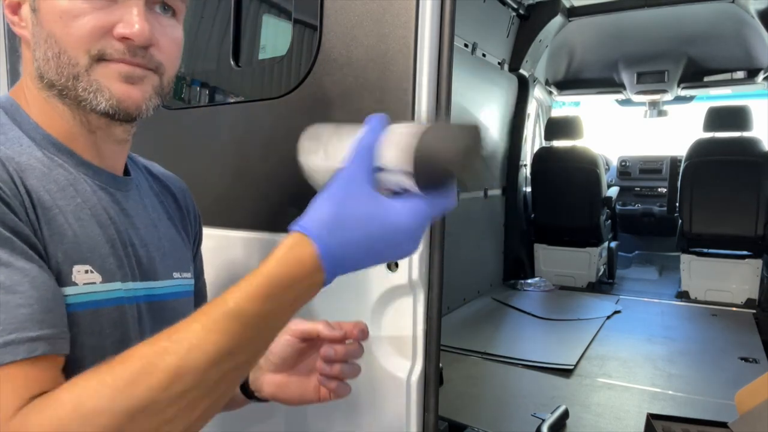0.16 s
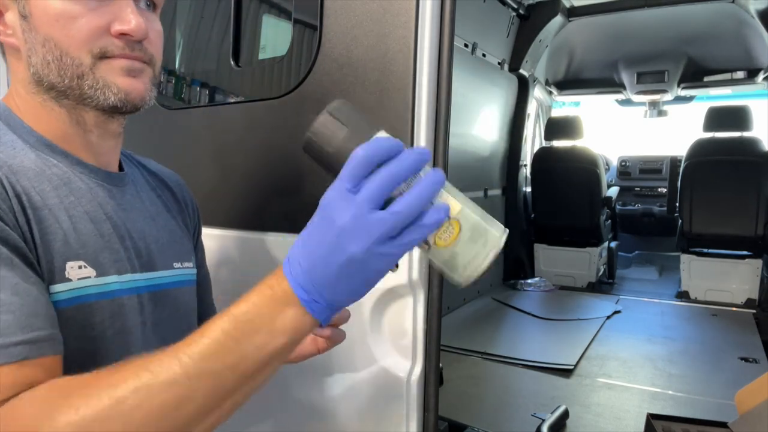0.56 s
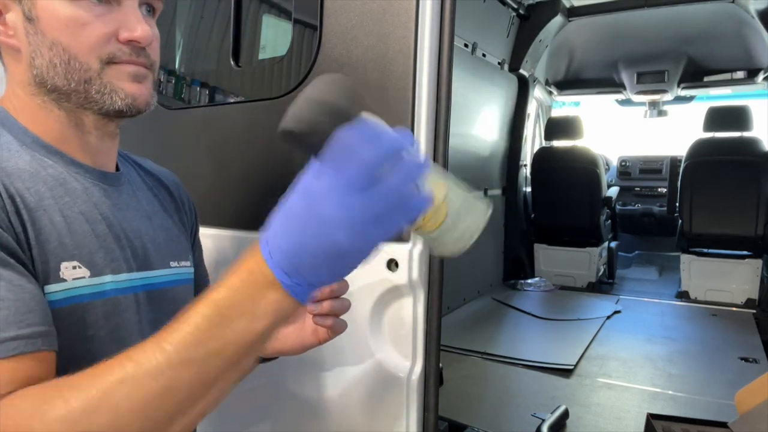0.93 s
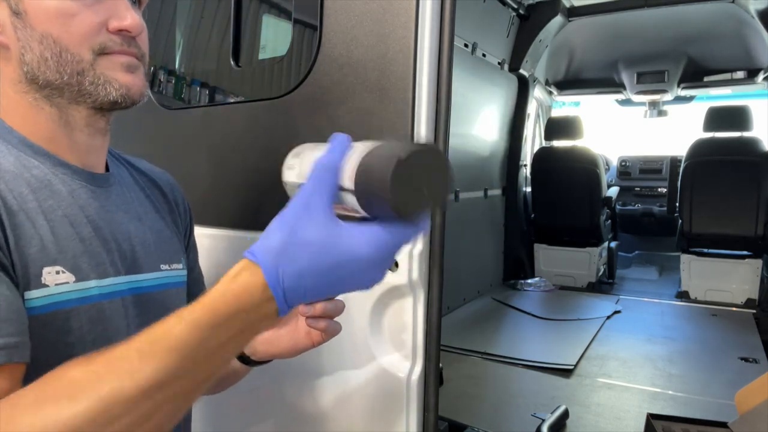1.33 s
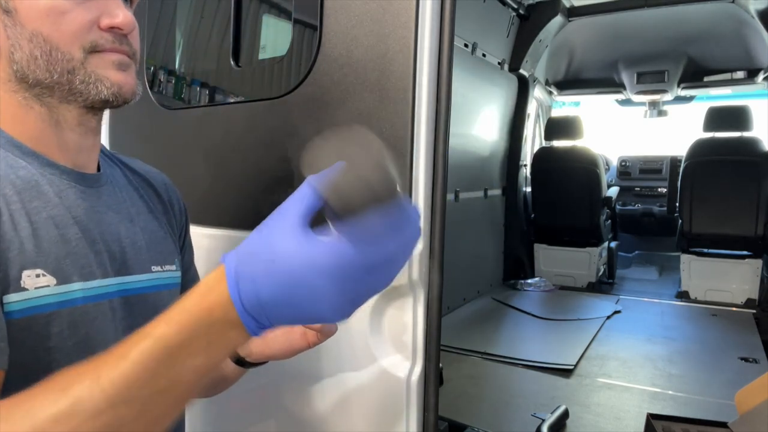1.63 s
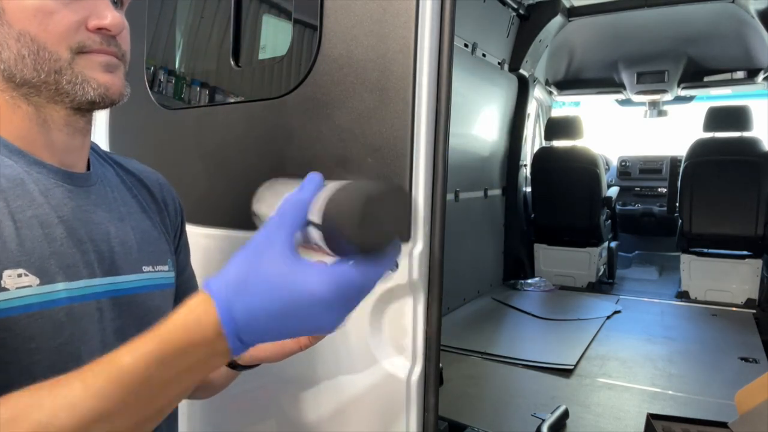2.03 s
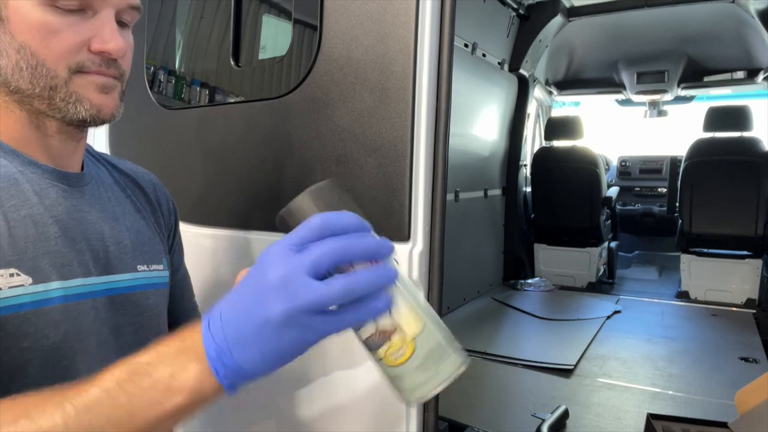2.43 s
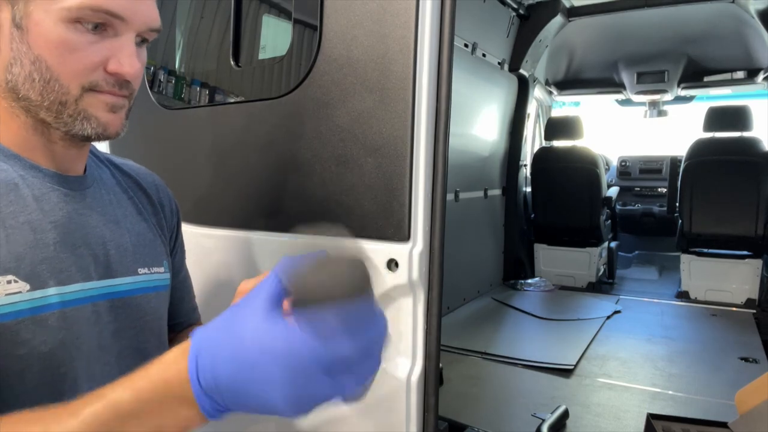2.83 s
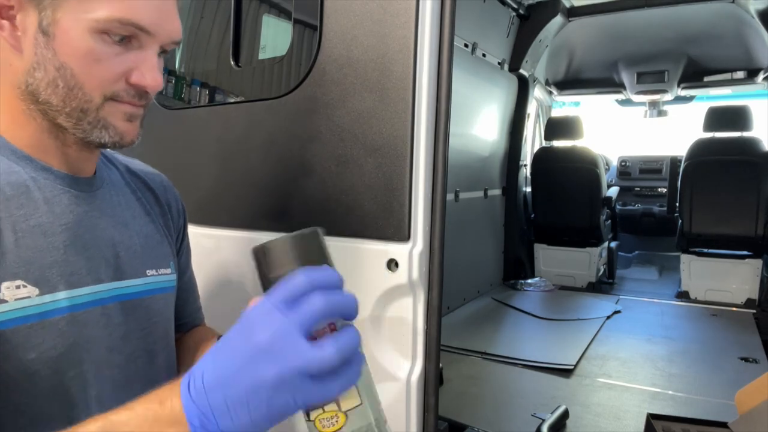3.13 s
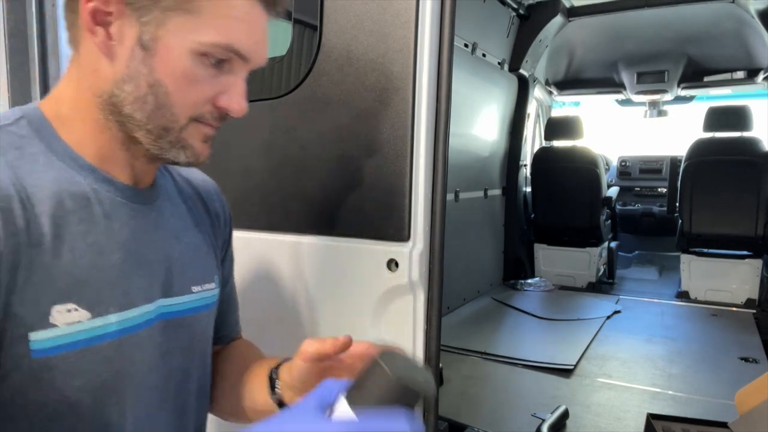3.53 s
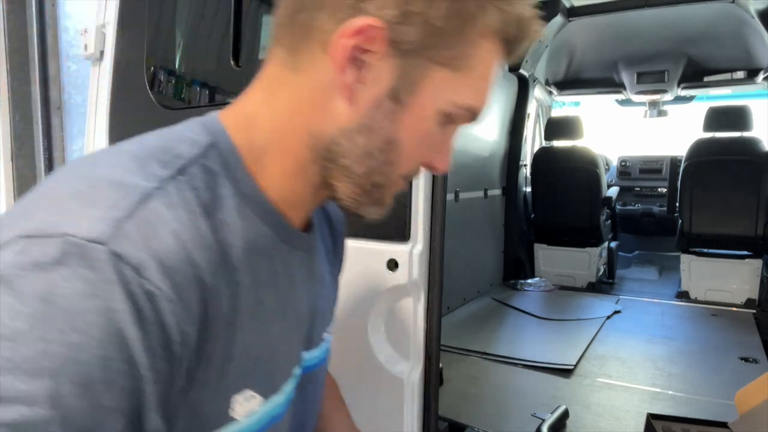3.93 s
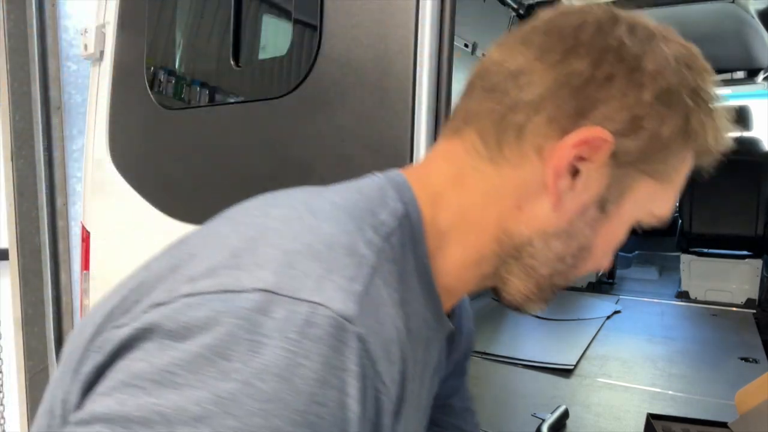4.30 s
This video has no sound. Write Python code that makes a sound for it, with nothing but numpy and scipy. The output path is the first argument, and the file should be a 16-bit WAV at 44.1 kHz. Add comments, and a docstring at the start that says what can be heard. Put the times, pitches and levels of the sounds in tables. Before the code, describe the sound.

Rapid metallic rattling of a ball inside an aerosol can, echoing in an empty van, stops and gives way to small put-down knocks.

```python
"""Hard, bright clacks come first: a paint can is shaken at the open back of a van, over an echo already ringing.
Each clack is a short push of the ball, with a crack and shiver, heard through the modes of the can.
Turned in the hand, the can knocks duller; then small taps and scrapes set it down. Filtered slaps, splats
and froth make the paint. The can lies a little right of the stereo microphones; noise tails echo as the bare
cargo bay; shaped noise and a sine make the faint outdoor rumble, air and hum."""
import sys
import numpy as np
from scipy import signal
from scipy.fft import rfft, irfft, next_fast_len
from scipy.io import wavfile

SR = 44100
rng = np.random.default_rng(int(sys.argv[2]) if len(sys.argv) > 2 else 0)


def materialize(psi):
    """Save the field psi as 16-bit PCM at rate SR to the path in sys.argv[1].

    A 1-D psi becomes a single channel; in a 2-D psi each row is a channel.
    """
    bounded = np.clip(np.atleast_2d(psi).T, -1, 1)
    quanta = np.round(bounded * 32767).astype(np.int16)
    wavfile.write(sys.argv[1], SR, quanta)


N = 196641

SIZE = 4096  # samples in one contact
HZ = np.fft.rfftfreq(SIZE, 1 / SR)
LEAD_S = 0.001835  # a short swell of noise before each hit
TURN_S = 1.58  # the hand turns the can
TYPICAL_DB = -10.5  # strength of a typical blow

# the ball hits the can: (start time [s], strength [dB], dome ring [dB], nominal dome pitch [Hz],
# dullness [dB], nominal shell pitch [Hz], nominal wall pitch [Hz], extra crack [dB])
BLOWS = [(0.009, -5.5, -25.5, 1830, -0.5, 3600, 1110, 2), (0.058, -11, -24.5, 1860, -4, 3840, 1090, 5.5),
         (0.086, -4, -19.5, 1804, 5, 3750, 990, 1.5), (0.142, -5.5, -49, 1750.0, 3, 3770, 700, 8),
         (0.165, -8, -26.5, 1800, -1.5, 3920, 1070.0, -5), (0.219, -8, -30, 1800, -2.5, 4470, 1050.0, 4.5),
         (0.25, -6, -21.5, 1760, 3, 3080, 1100, 2), (0.31, -6, -35, 1950, 3, 3880, 764, 3.5),
         (0.339, -8, -23.5, 1860, 0.5, 3440, 980.0, 3.5), (0.365, -10, -40, 1970, 1.5, 4470, 730, 2),
         (0.415, -14.5, -30, 1830, -3, 3740, 1050.0, 3), (0.477, -27.5, -31, 1740, -4, 4230, 1090.0, 25),
         (0.501, -8, -27.5, 1830, -4.0, 3600, 930, 2), (0.551, -13.5, -33, 1940, -6, 4670, 880.0, 3),
         (0.584, -12, -33, 2180, 5.0, 3480, 870, 3), (0.591, -14.5, -29, 1800, -3.5, 2940, 770.0, 9.5),
         (0.645, -18, -25.5, 1794, 5.5, 3750, 1010.0, 16), (0.694, -19, -38.5, 1850, 4, 4930, 890, 17),
         (0.719, -6, -28, 1910, 0.5, 4200, 826, -1.5), (0.736, -19, -30.5, 1850, -6, 3150, 1000.0, -4),
         (0.747, -11.5, -29, 2060, -0.5, 3420, 1010, 1), (0.755, -9, -24, 1760, -1, 3500, 1090, 2.5),
         (0.824, -3.5, -22.5, 1836, -1, 3830, 720, -1.5), (0.895, -7, -24.5, 1830, 3, 3400, 840, 4),
         (0.932, -9.5, -28.5, 1860, -6.5, 4340, 1050.0, -7),
         (0.938, -8.5, -34, 1860, -2.5, 3900.0, 1070.0, -3),
         (0.948, -12.5, -29, 1740, -1.5, 3480, 1080.0, 9), (0.976, -10, -35, 1640, 1, 4660, 1070.0, 6),
         (0.992, -4.5, -37, 1820, 1.5, 3630, 790, -7), (1.006, -7, -26, 1730, 4.5, 3570, 910, 4.5),
         (1.066, -11, -29, 1830, -6, 4260, 920.0, 2), (1.093, -4.5, -22.5, 2020, 5.5, 3080, 1070, -2),
         (1.108, -9, -25.5, 1800, -1, 3770, 1110, 3), (1.145, -10.5, -37, 1600, -3.5, 4600, 990, -19),
         (1.16, -5.5, -38, 2030, 4.5, 4050, 870, -13), (1.198, -24.5, -53, 1770, -13.5, 4850, 960.0, -12),
         (1.238, -19.5, -27, 1920, -8.5, 3550, 1110, 13), (1.261, -9.5, -34, 1920, -4.5, 4600, 960, -2),
         (1.283, -42, -29.5, 1870, 16.5, 3680.0, 960, 2), (1.329, -7.5, -33, 1720, 1, 4130, 920, 2.5),
         (1.366, -14, -36, 1800, 3.5, 3360, 795, 4), (1.394, -8.5, -33, 2150, -1, 4150, 855, 2),
         (1.42, -16.5, -33, 1840, -6, 3570, 1010.0, 10), (1.434, -9.5, -29.5, 1760, -3, 3900, 1080, 0),
         (1.448, -7.5, -25, 1906, 1, 3600, 1090, 3.5), (1.495, -2.5, -42, 1510, 1.5, 4480, 730, -29),
         (1.521, -7.5, -27.5, 1740, 0, 4100, 1010, -0.5), (1.63, -8, -24.5, 1415, -2, 3950, 1090, -3),
         (1.642, -20, -33, 1580, -4, 4300, 950, -3), (1.653, -7, -40, 1570, -1.5, 4650, 815, 3),
         (1.684, -12, -31.5, 1700, -3, 4760, 940, 1.5), (1.697, -12.5, -28, 1700, -2.5, 3560, 1030.0, -12),
         (1.749, -9, -28.5, 2000, -1, 3070, 880, 5), (1.776, -10.5, -24, 2260, 4, 3340, 1120, 4),
         (1.795, -24, -37, 2050, 3, 3470.0, 900.0, 4), (1.819, -14, -33, 1490, 1.5, 3860, 830, 9),
         (1.86, -6.5, -26, 1720, -2, 4600, 1050, -8), (1.896, -19.5, -33, 1840, -3, 3344, 760.0, 3),
         (1.911, -26, -36, 1810, 0, 3540, 980, 4), (1.94, -36, -29, 1860, -1, 3730.0, 1010.0, 7),
         (1.988, -10.5, -40, 1490, 2, 4040, 910, 6), (2.035, -5, -25.5, 1640, -3, 4480, 1060, -6.5),
         (2.069, -15.5, -32, 1870, 0, 3720.0, 830, 3.5), (2.093, -20, -40, 1780, -4.5, 3180, 910.0, 2),
         (2.105, -22, -41, 1970, -7, 3500, 960, -8), (2.126, -4, -22, 1800, 2, 4740, 1190, 1),
         (2.141, -11, -48, 1820, -1.5, 3800, 980, 1), (2.16, -13.5, -44.0, 1410.0, 2.5, 3570.0, 804, 4),
         (2.172, -18, -53, 1600.0, -1.5, 3920.0, 740.0, 5),
         (2.206, -4.5, -21.5, 1540, -3, 4300.0, 1100, -10), (2.23, -14.5, -28.5, 1900, -1, 4230, 920, 1),
         (2.299, -6.5, -22.5, 1764, 0.5, 3060, 1000, 0), (2.323, -18.5, -34, 1700, -1.5, 4570, 1080.0, 8),
         (2.336, -11.5, -36, 1480, 0, 3250, 900, -6), (2.379, -20, -45, 1870, -4, 4160, 910, 1),
         (2.424, -9.5, -27.5, 1890, -2.5, 4180, 900, -2), (2.46, -13, -23.5, 1880, 4, 3920, 1100, 7),
         (2.472, -15, -41, 1860, -1, 3940, 880, -2), (2.49, -23, -51, 1660, -6, 3560, 1000.0, 9.5),
         (2.499, -15.5, -29.5, 1470, 1.5, 4160, 990, -9), (2.548, -5, -25.5, 1760, 0, 5140, 960, -4),
         (2.583, -13, -31, 1840, -1, 4240, 800, 0), (2.597, -24, -35, 1850, -4, 4060, 800.0, 1),
         (2.625, -20, -33, 1750, -5.5, 4460, 1040.0, -2), (2.679, -7, -45, 1420, -2.5, 4400, 790, -1),
         (2.712, -4.5, -23, 1520, -1.5, 4000, 1060, -4), (2.751, -16.5, -30, 2320, -2, 4260, 840.0, 1.5),
         (2.778, -22, -46, 1790, -5, 4300, 950, 2), (2.785, -23, -41, 1770, -4.5, 3660.0, 1040.0, -3),
         (2.809, -16.5, -20, 1810, -1.5, 3970, 1060, 1.5), (2.82, -19.5, -43, 1800, 1, 4400, 950, -3.5),
         (2.843, -5.5, -35, 1780, -2.5, 4400, 920, 1), (2.888, -5, -24, 1765, 0, 4700, 1020.0, -0.5),
         (2.936, -15, -30, 1770, -2, 3080, 1000, 6), (2.97, -14.5, -26, 1900, 1.0, 4630, 1100, 2),
         (2.982, -14, -26, 1500, -1.5, 4670, 1030, 2), (3.009, -13, -40, 1630.0, -0.5, 4070, 870, 3.5),
         (3.058, -6.5, -25, 1556, -0.5, 4700, 1040, -4), (3.081, -45, -32.5, 1440, 3, 3700, 1130, -7),
         (3.116, -14, -24.5, 1970, -3.5, 3580, 800, 4.5), (3.144, -6, -19, 1745, -0.5, 2770, 874, 0.5),
         (3.159, -24, -42, 1530, 6, 4170.0, 955, -4), (3.18, -19, -32, 2170, -1.5, 3960, 870.0, 2),
         (3.232, -10.5, -26.5, 1840, -0.5, 3320, 1010, -5),
         (3.256, -37, -31.0, 1740, -7, 3420.0, 1080.0, 2), (3.276, -35, -39, 1710, -2, 3590.0, 1120.0, -5),
         (3.291, -12.5, -30, 1780, -5.5, 3700, 950.0, 0), (3.321, -7, -24, 1620, -1.5, 4630, 1040, -4),
         (3.34, -28, -25.5, 1700, 7, 3870, 1100, 6), (3.357, -11.5, -31, 1550, -1.5, 4440, 850, 2),
         (3.397, -7, -19, 1770, -5.5, 4500, 1100.0, -2.5), (3.41, -24, -28.5, 1540, 9.5, 3780.0, 980, -5),
         (3.447, -13.5, -34, 2020, -3, 4200, 860.0, -1), (3.476, -22.5, -32.5, 1730, -2, 4070, 1060, 0),
         (3.489, -26.5, -34, 1780, 2, 4020.0, 1000, 2), (3.513, -27.5, -37.5, 1690, -5, 3150.0, 950, -3),
         (3.557, -57, -45, 1750, -4, 3550, 1080.0, 1)]
# how strongly the paint churns: (time [s], level [dB])
CHURNING = [(0.0, -46), (0.19, -49), (0.42, -46.5), (0.67, -51), (0.89, -46.5), (1.15, -47.5), (1.48, -58),
            (1.87, -35), (2.13, -40), (2.49, -41.5), (2.67, -38.5), (3.34, -41.5), (3.54, -43),
            (3.63, -54.5), (3.83, -47), (3.91, -57), (4.02, -40), (4.12, -44.5), (4.25, -38.5), (4.37, -60),
            (4.46, -59)]
# the can's wall, strongest mode first: (centre [Hz], nominal width [Hz], relative level [dB])
WALL_MODES = [(1000, 820, -3.5), (434, 393, -5), (1230, 990, -4)]
# the domed base, struck at its centre: (centre [Hz], nominal width [Hz], relative level [dB])
DOME_MODES = [(1825, 106, 4.5), (1473, 102, -6.5), (2320, 234, -6.5)]
# the steel shell, strongest mode first: (centre [Hz], nominal width [Hz], relative level [dB])
SHELL_MODES = [(3900, 1200, 4), (2680, 2000, -9), (4440, 800, -11.5)]
# high modes at the point of contact: (centre [Hz], nominal width [Hz], relative level [dB])
CONTACT_MODES = [(6110, 1650, 4), (6430, 1200, 0.5), (9010, 1220, -3.5), (13400, 460, -20),
                 (15700, 440, -56)]
# the bare snap of ball on steel: (centre [Hz], nominal width [Hz], relative level [dB])
SNAP_MODES = [(5300, 1320, 1), (2940, 1230, -3), (12000, 890, -20)]


def amp(db):
    """Decibels to gain."""
    return 10 ** (np.asarray(db) / 20)


def unit(x):
    """Scale to rms 1."""
    return x / np.sqrt(np.mean(np.abs(x) ** 2) + 1e-20)


def along(points, hz):
    """(Hz, value) points read on a log frequency axis."""
    f, v = np.transpose(points)
    return np.interp(np.log(hz + 1), np.log(f + 1), v)


def filtered(x, response):
    """x times a response of frequency."""
    m = next_fast_len(N + SR // 2)
    spectrum = rfft(x, m) * response(np.fft.rfftfreq(m, 1 / SR))
    return irfft(spectrum, m)[..., :N]


def coloured(x, spectrum):
    """x shaped by (Hz, dB) points, at rms 1."""
    return unit(filtered(x, lambda hz: amp(along(spectrum, hz))))


def noise(side_db):
    """White stereo noise, from mono to fully unrelated sides (0 dB)."""
    mid, side = rng.standard_normal((2, N))
    return mid + amp(min(side_db, 0)) * np.array([side, -side])


def add(out, s, sound):
    """Mix a sound in at a time."""
    room = out[..., max(round(s * SR), 0):][..., :SIZE]
    room += sound[..., :room.shape[-1]]


def causal(gain):
    """The minimum-phase response with this gain: it rings only after the blow."""
    cepstrum = irfft(np.log(np.maximum(gain, 1e-6)))
    cepstrum[1:SIZE // 2] *= 2
    cepstrum[SIZE // 2 + 1:] = 0
    return np.exp(rfft(cepstrum))


def retuned(modes, first_hz, damping=1):
    """Shift a group of modes so that its first lies at a pitch; damping widens them."""
    return [(hz * first_hz / modes[0][0], width * damping, db) for hz, width, db in modes]


def resonances(modes, detune, vary_db):
    """Gain of a group of modes; each point of impact shifts and weights them anew."""
    power = 0
    for hz, width, db in modes:
        centre = hz + detune * min(width, hz / 2) * rng.uniform(-1.33, 1)
        off = (HZ ** 2 - centre ** 2) / (width * (HZ + 1))
        mode_power = amp(db + vary_db * rng.normal()) ** 2
        power = power + mode_power / (1 + off ** 2) / (1 + (off / 1.13) ** 2)
    return np.sqrt(power)


def bending(delay_ms, corner_hz):
    """Low bending waves travel slowly, so each knock chirps downward, more so the farther they run."""
    scatter = 0.449  # how much the chirp differs from blow to blow
    delay_s = delay_ms / 1000 * np.exp(scatter * rng.normal())
    return np.exp(-2j * np.pi * delay_s * corner_hz * np.arctan(HZ / corner_hz))


def bounces(db, window_s, count=4):
    """A contact followed by a few, usually weaker, at chance moments, which make its colour ragged."""
    late, size = rng.random(count), rng.standard_normal(count)
    delays = np.exp(-2j * np.pi * np.outer(window_s * (0.0962 + late), HZ))
    return 1 + amp(db) * size @ delays


def strike(parts, levels, shiver_db, shiver_t60, apart_db, rise_s):
    """Faint noisy swell, then sharp push with tiny bounces, crack and brief shiver, through groups of modes."""
    t = np.arange(SIZE) / SR
    treble = HZ / (HZ + 1500)  # shell modes crowd in the treble
    common, *own = rng.standard_normal((3, SIZE))
    crack = amp(-1.0 - 60 * t / 0.00043)
    fade = (amp(-60 * t / shiver_t60) + crack) * (1 - np.exp(-t / rise_s))
    shiver = unit(rfft((common + amp(apart_db) * np.array(own)) * fade))
    swell = unit(rfft(rng.standard_normal(SIZE) * t * (t < LEAD_S)))
    blow = bounces(db=-16, window_s=0.0054) + amp(shiver_db) * shiver * treble
    drive = amp(-10.5) * swell * treble + blow * np.exp(-2j * np.pi * HZ * LEAD_S)

    # before radiation, each level is the rms over a hundredth of a second
    span = SR / 100
    power, drive_power = 0, np.mean(np.abs(drive) ** 2, axis=0)
    for modes, db in zip(parts, levels):
        gain = resonances(modes, detune=0.37, vary_db=1.5)
        power = power + span * (amp(db) * gain) ** 2 / np.mean(gain ** 2 * drive_power)
    radiated = HZ ** 2 / np.sqrt(HZ ** 4 + 222 ** 4)  # the small can gives off little below 222 Hz
    response = causal(np.sqrt(power) * radiated)
    return irfft(drive * response * bending(delay_ms=1.646, corner_hz=466))


def outdoors(rumble_db, air_db, hum_db, hum_hz):
    """Far rumble and airy hiss are shaped noise; the hum of some machine is a steady sine."""
    # spectrum of the far rumble: (frequency [Hz], relative level [dB])
    rumble_colour = [(15, -28), (35, 0), (60, 4.5), (110, 2), (170, -2), (300, -13), (600, -32),
                     (1200, -33), (3000, -55)]
    # spectrum of the hiss: (frequency [Hz], relative level [dB])
    air_colour = [(400, 6.5), (800, 5), (1150, 10.5), (2000, -1), (5000, 3), (10000, -10), (16000, -58)]
    hum = np.sqrt(2) * np.sin(2 * np.pi * hum_hz * np.arange(N) / SR)
    air = coloured(rng.standard_normal((2, N)), air_colour)
    rumble = coloured(noise(-12.5), rumble_colour)
    return amp(rumble_db) * rumble + amp(air_db) * air + amp(hum_db) * hum


def earlier_echo(db, t60):
    """The bay is already ringing from earlier shakes at the start: coloured noise that dies away."""
    colour = [(300, -11), (1200, -28), (1770, 12), (2400, -0.5), (3600, -1), (6500, -9), (9000, -30), (15000, -50)]
    return amp(db - 60 * np.arange(N) / SR / t60) * coloured(noise(0), colour)


def cargo_bay(x, count=16):
    """The van's steel bay answers with decaying noise tails, which crossfade in turn as the can moves."""
    # decay of the bay: (frequency [Hz], time to fall 60 dB [s])
    bay_decay = [(200, 0.12), (600, 0.084), (1500, 0.36), (4000, 0.49), (7000, 0.35), (14000, 0.12)]
    # strength of the bay's answer: (frequency [Hz], echo level [dB])
    bay_level = [(150, -33), (500, -10), (1000, -13), (1800, -7), (3300, 0), (5000, -7), (6500, -6),
                 (9000, -10.5), (14000, -5.5)]
    wet, places = np.zeros((2, N)), np.linspace(0, N, count)
    for share in np.eye(count):
        hz, t, z = signal.stft(rng.standard_normal((2, SR * 3 // 4)), SR, nperseg=256)
        alike = np.sinc(hz / 2600)[:, None]  # long waves reach both microphones alike
        mid, side = z[0] * np.sqrt(1 + alike), z[1] * np.sqrt(1 - alike)
        fade = amp(-60 * t / along(bay_decay, hz)[:, None]) * (1 - np.exp(-t / 0.00042))
        fade = fade / np.sqrt(np.mean(fade ** 2, axis=1, keepdims=True))
        shaped = np.array([mid + side, mid - side]) * fade * amp(along(bay_level, hz))[:, None]
        tail = signal.istft(shaped, SR, nperseg=256)[1]
        sent = x.mean(0) * np.sqrt(np.interp(np.arange(N), places, share))
        wet += signal.oaconvolve(sent[None], tail / np.sqrt(tail.size), axes=1)[:, :N]
    return wet


def placed(x, lag_ms):
    """A little to the right: sound reaches the left microphone later and, at most pitches, weaker."""
    # difference between the microphones: (frequency [Hz], right over left [dB])
    right_over_left = [(250, 1.5), (1000, 1), (2000, -0.8), (4000, 2.5), (7000, 3.5), (12000, -2)]
    wrap_hz = 14200  # long waves wrap around the microphones and lag more; here the lag has halved
    sides = np.array([[-.5], [.5]])

    def response(hz):
        lag_s = lag_ms / 1000 / (1 + hz / wrap_hz)
        return np.exp(2j * np.pi * hz * lag_s * sides) * amp(along(right_over_left, hz) * sides)

    return filtered(x, response)


def paint(slap_db, spread_db, splat_db, froth_db, slaps_per_s, count=200):
    """Paint slaps the can's ends at set times; more slaps at chance moments, splats and froth follow the churning."""
    # spectrum of sloshing paint: (frequency [Hz], relative level [dB])
    slosh = [(100, -38), (270, -5.5), (480, -0.5), (1000, -3), (1600, 0), (2500, -5), (6000, -18),
             (16000, -66)]
    # soft low knocks at set times: (time before the lead delay [s], level [dB], spectrum centre [Hz])
    timed_slaps = [(0.106, -60, 1070.0), (0.177, -44, 1050.0), (0.197, -51, 890.0), (0.385, -50.5, 830.0),
                   (0.535, -54, 1216), (0.671, -56, 1200), (1.038, -50, 1200), (2.25, -48, 1010),
                   (2.915, -52, 1100), (0.774, -47, 1180.0), (0.857, -47, 1050), (0.965, -48, 875),
                   (1.468, -47.5, 865), (1.643, -49, 910.0), (1.668, -44, 564), (1.828, -46, 675),
                   (1.84, -56, 550.0), (1.873, -49, 1230.0), (2.047, -44.5, 910), (2.186, -55, 560.0),
                   (2.635, -47, 820.0), (2.725, -44, 1060), (2.859, -45, 570.0)]
    slosh_hz = 915  # the centre of the slosh spectrum
    last_blow_s = BLOWS[-1][0]

    def slap(pitch):
        colour = causal(amp(along(slosh, HZ / pitch)))
        ragged = bounces(db=-8, window_s=0.0061)
        return unit(irfft(colour * ragged * bending(delay_ms=2.68, corner_hz=591)))

    chance, splats, timed = np.zeros(N), np.zeros(N), np.zeros(N)
    for k, (late, size, pitch) in enumerate(rng.random((count, 3))):
        s = (k + late) / slaps_per_s
        if s < last_blow_s:
            add(chance, s, amp(slap_db - spread_db * size) * slap(.85 + .5 * pitch))
    for s, db, hz in timed_slaps:
        add(timed, s + LEAD_S, amp(db) * slap(hz / slosh_hz))
    splats[(rng.random(count) * last_blow_s * SR).astype(int)] = rng.random(count) ** 2
    splats = unit(signal.fftconvolve(splats, slap(0.66))[:N])
    froth = coloured(rng.standard_normal((2, N)), slosh)
    churn = amp(np.interp(np.arange(N) / SR, *np.transpose(CHURNING)))
    return timed + churn * (chance + amp(splat_db) * splats + amp(froth_db) * froth)


def put_down():
    """Taps and short scrapes as the can comes to rest; surface and rim ring, the hand damps the dome."""
    # lowering, landing and the ball rolling to rest: (start time [s], surface thud [dB],
    # wall knock [dB], dome ring [dB], rim clack [dB], nominal dome pitch [Hz], shiver swell [s])
    landing_taps = [(3.555, -70, -61, -48, -66, 1700, .001), (3.661, -76, -44, -33.5, -38.5, 2163, 0.00071),
                    (3.748, -64, -56, -42, -53, 1780, .0002), (3.761, -70, -58, -49, -52, 1800, 0.00056),
                    (3.778, -62, -61, -51, -55, 1760, .0005), (3.787, -71, -50, -42.5, -51, 1850, 0.00049),
                    (3.884, -52, -70, -66, -68, 1700, .001), (3.928, -55, -54, -49, -50, 1700, .001),
                    (3.936, -33.5, -49, -37, -44, 1710, .0003), (3.945, -30.5, -54, -37, -39, 1700, 0.0011),
                    (3.954, -41, -32.5, -25.5, -20.5, 2160, 0.00034),
                    (3.972, -40, -37, -34, -36.5, 1680, .002), (3.996, -52, -43, -29.5, -50, 1770, 0.00026),
                    (4.022, -53, -41, -41, -50, 1330, .0005), (4.038, -50, -44, -48, -43, 1400, 0.00055),
                    (4.142, -57, -45, -43, -38, 1990, 0.00046), (4.174, -50, -38.5, -29, -39, 1680, .0002),
                    (4.207, -46, -39, -30.5, -45, 1600, 0.0002), (4.228, -56, -36, -37, -52, 1360, .0002),
                    (4.241, -54, -42, -38, -50, 1580, .001), (4.403, -73, -43, -39.5, -54, 1680, 0.00019),
                    (4.419, -66, -47, -43, -58, 1940, .0005)]
    # the surface under the can: (centre [Hz], nominal width [Hz], relative level [dB])
    surface = [(512, 40, 2.5), (931, 26, 1), (565, 730, -7)]
    # the stiff rim that it lands on: (centre [Hz], nominal width [Hz], relative level [dB])
    rim = [(1630, 67, 10.5), (1920, 61, 8), (2210, 42, -7), (2440, 290, -8), (4000, 2300, 2),
           (5570, 740, -7)]
    wall = retuned(WALL_MODES[:1], first_hz=1137, damping=0.62)
    out = np.zeros((2, N))
    for s, thud, knock, ring, clack, dome_hz, swell_s in landing_taps:
        dome = retuned(DOME_MODES, dome_hz, damping=2.7)
        parts = surface, wall, dome, rim, CONTACT_MODES
        levels = thud, knock, ring, clack, clack - 0.5
        add(out, s, strike(parts, levels, shiver_db=8.5, shiver_t60=0.026, apart_db=1.5, rise_s=swell_s))
    return out


def chatter(db, spread_db, soonest_s, window_s, shell_hz, scatter, count=6):
    """After each end-on blow the ball skitters along the steel in small, clean, bright ticks."""
    out = np.zeros((2, N))
    for s, strength, *_ in BLOWS:
        if s >= TURN_S:
            continue
        for late, size, spot in rng.random((count, 3)):
            level = strength + db - spread_db * size
            parts = retuned(SHELL_MODES, shell_hz * np.exp(scatter * (spot - .5))), SNAP_MODES
            levels = level + 0.5, level - 1.5
            tick = strike(parts, levels, shiver_db=-6, shiver_t60=.003, apart_db=10, rise_s=.00005)
            add(out, s + soonest_s + window_s * late, tick)
    return out


def grazes(db, spread_db, follow, soonest_s, window_s):
    """The ball rebounds and glances off the wall, harder after a hard blow and as the paint churns more."""
    # a glancing hit, relative to its level: (wall knock [dB], dome ring [dB], clack [dB], tick [dB])
    glance = (8, 6, 1.5, 10)
    parts = WALL_MODES, DOME_MODES, SHELL_MODES, CONTACT_MODES
    out = np.zeros((2, N))
    for (s, strength, *_), (late, size) in zip(BLOWS, rng.random((len(BLOWS), 2))):
        churn_db = np.interp(s, *np.transpose(CHURNING))
        level = churn_db + db - spread_db * size + follow * (strength - TYPICAL_DB)
        graze = strike(parts, level + np.array(glance), shiver_db=29.0, shiver_t60=0.0062,
                       apart_db=-6.5, rise_s=.0001)
        add(out, s + soonest_s + window_s * late, graze)
    return out


def ball():
    """The ball flies from end to end: grip and force share each blow among the can's modes."""
    # how a blow divides before the turn; rows are wall knock, steel clack, contact tick, snap, base ring:
    # (level re strength [dB], level added per dB of extra force [dB/dB])
    end_on = [(-27.5, -.5), (-16, 0.16), (-22, 1), (-22, -0.02), (-25, -0.74)]
    # the same rows and columns after the turn
    turned = [(-17.5, -0.3), (-26, -0.17), (-22.5, -0.21), (-29.5, 0.1), (-46, -0.21)]
    # the whole base rings on at one nominal pitch: (centre [Hz], nominal width [Hz], relative level [dB])
    base_modes = [(1786, 39, 0)]
    out = np.zeros((2, N))
    for s, strength, ring, dome_hz, dull, shell_hz, wall_hz, crack in BLOWS:
        grip, tick_hz, damping = (end_on, 6010, 1.74) if s < TURN_S else (turned, 6480, 1.5)
        force = strength - TYPICAL_DB
        knock, clack, tick, snap, base = (strength + db + growth * force for db, growth in grip)
        # a softer landing trades clack for knock
        knock, clack, tick = knock + dull, clack - dull, tick - dull + crack
        wall, dome = retuned(WALL_MODES, wall_hz), retuned(DOME_MODES, dome_hz, damping)
        shell, contact = retuned(SHELL_MODES, shell_hz), retuned(CONTACT_MODES, tick_hz)
        parts = wall, dome, shell, contact, SNAP_MODES, base_modes
        levels = knock, ring, clack, tick, snap, base
        # clacks shiver more than knocks, but the hardest blows are the cleanest
        shiver_db = 4.0 + np.tanh((clack - knock) / 8) - 0.08 * force + 2.5 * rng.normal()
        add(out, s, strike(parts, levels, shiver_db, shiver_t60=.023, apart_db=3.5, rise_s=.00012))
    return out


def scene():
    """The shaken can and its setting down, with the van's echo and the outdoor floor."""
    # the can held low feeds the bay another colour: (frequency [Hz], gain [dB])
    low_colour = [(300, -1), (1500, 3), (2400, -1.5), (3300, -3), (4200, -1), (5500, 2), (9000, -0.5)]
    shaking = ball()
    shaking += grazes(db=0.5, spread_db=14.5, follow=0.25, soonest_s=0.0055, window_s=0.018)
    shaking += paint(slap_db=-7.5, spread_db=31, splat_db=-8.5, froth_db=-7, slaps_per_s=26)
    shaking += chatter(db=-26, spread_db=21.5, soonest_s=0.0051, window_s=0.033, shell_hz=4650, scatter=0.63)
    resting = put_down()
    direct = placed(shaking, lag_ms=0.098) + placed(resting, lag_ms=0.086)
    low_down = filtered(resting, lambda hz: amp(along(low_colour, hz)))
    bay = cargo_bay(amp(-1.3) * shaking + amp(1.0) * low_down)
    echo = placed(bay, lag_ms=0.031) + earlier_echo(db=-30.5, t60=1.0)
    return direct + echo + outdoors(rumble_db=-56.5, air_db=-59.0, hum_db=-63.0, hum_hz=118.3)


def record(dry):
    """The recorder rounds off the highest peaks; its treble falls away toward its band limit."""
    top_hz, rolloff_hz = 16200, 14800
    held = dry / (1 + (dry / .95) ** 6) ** (1 / 6)
    return filtered(held, lambda hz: (hz < top_hz) / np.sqrt(1 + (hz / rolloff_hz) ** 20))


dry = scene()
out = record(dry)
materialize(out)
```